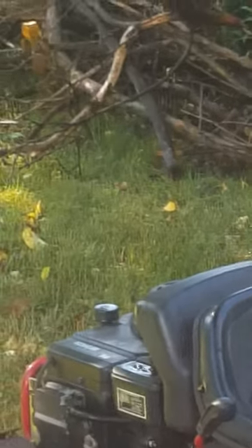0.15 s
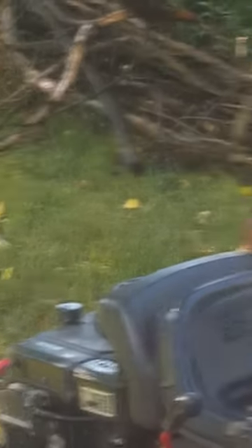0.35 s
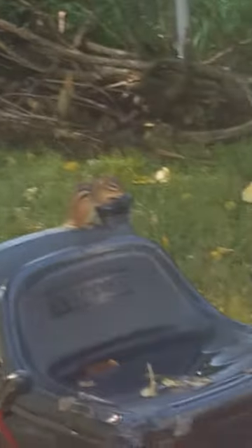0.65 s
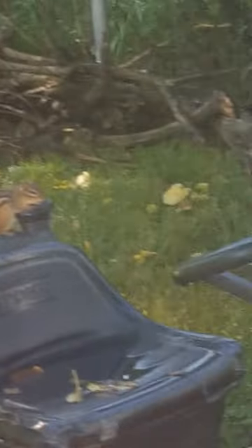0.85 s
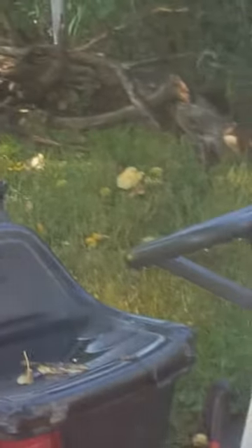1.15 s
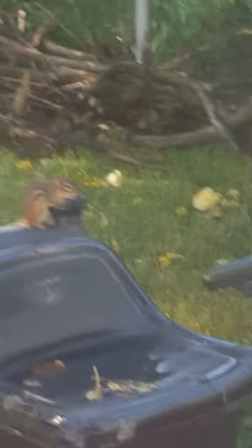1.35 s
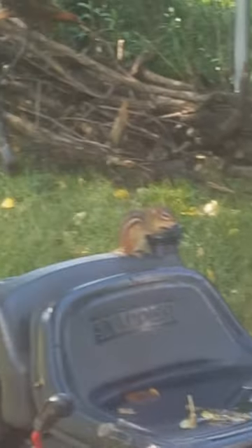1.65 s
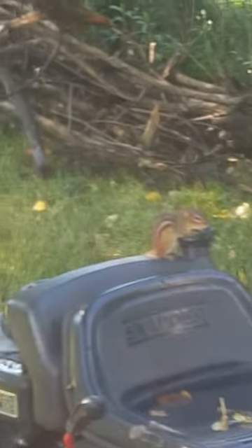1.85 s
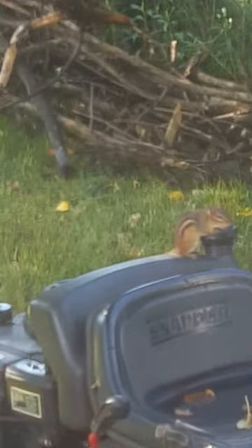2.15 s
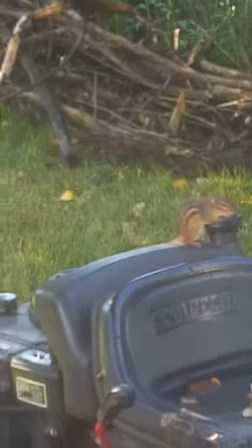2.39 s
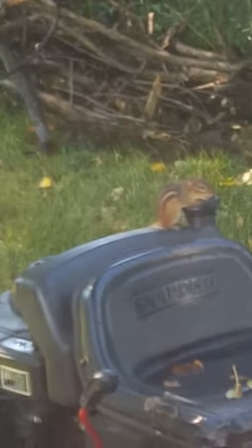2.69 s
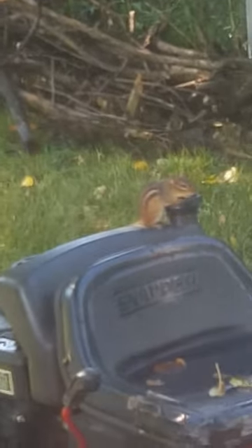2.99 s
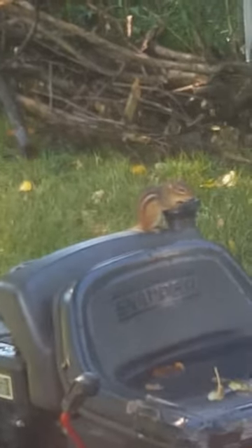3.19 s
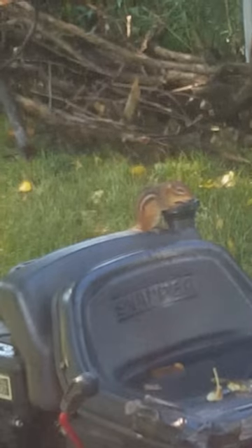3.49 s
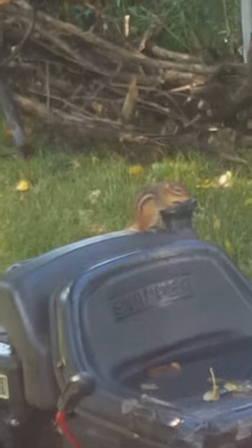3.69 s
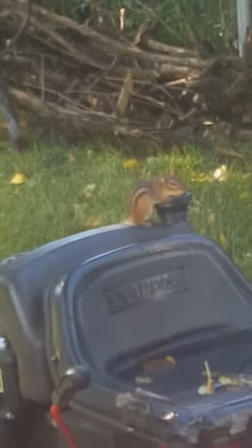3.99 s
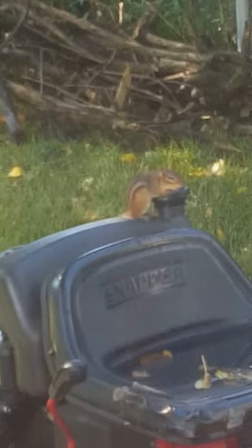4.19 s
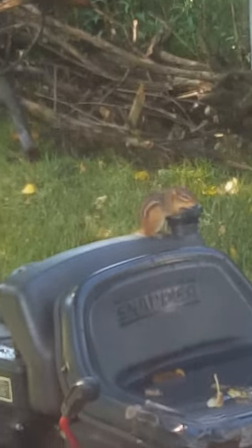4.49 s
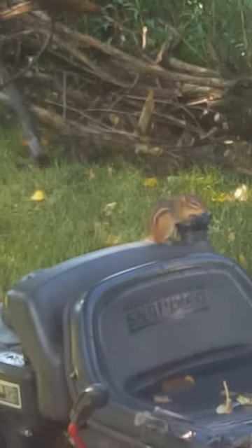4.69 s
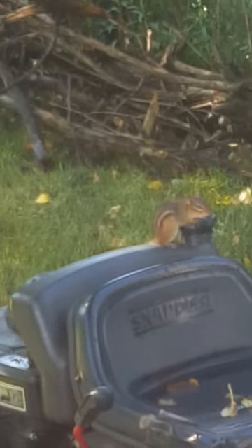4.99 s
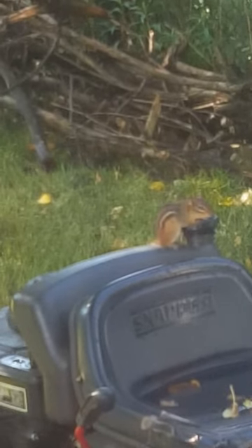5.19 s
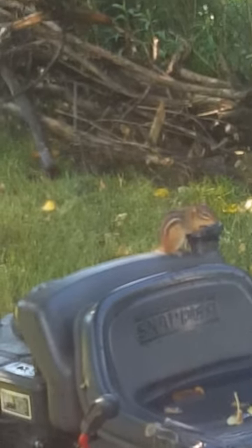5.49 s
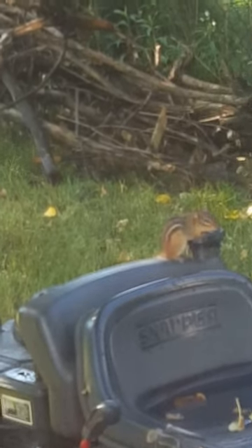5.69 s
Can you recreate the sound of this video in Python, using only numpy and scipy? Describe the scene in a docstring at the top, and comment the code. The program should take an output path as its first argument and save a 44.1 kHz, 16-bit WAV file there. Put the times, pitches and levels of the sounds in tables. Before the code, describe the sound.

A chipmunk chips steadily in a grassy yard while someone close to the microphone makes wavering, raspy lip squeaks; faint birds and a low engine drone behind.

```python
"""Songbirds sing far off over a low outdoor rumble, with a droning engine that eases off midway.
From the start a chipmunk on a parked mower chips its alarm about three times a second: a 50 ms whistle that
plunges in pitch, scattered back by the yard. Two dull bumps on the microphone and a small tick, perhaps a lip
click, follow. Then come seven close, wavering squeaks, probably kissing lips, in groups of three, one and three:
each catches a tone and sings louder as its pitch rises; most change roughness partway, usually into rasp."""
import sys
import numpy as np
from scipy import signal
from scipy.fft import rfft, irfft, next_fast_len
from scipy.io import wavfile
from scipy.ndimage import uniform_filter1d

SR = 44100
rng = np.random.default_rng(int(sys.argv[2]) if len(sys.argv) > 2 else 0)


def int16_out(signal):
    """Quantize to a 16-bit WAV file."""
    q = np.round(np.clip(np.atleast_2d(signal).T, -1, 1) * 32767)
    wavfile.write(sys.argv[1], SR, q.astype(np.int16))


N = 257984
T = np.arange(N) / SR

# colour of the outdoor background: (frequency [Hz], relative level [dB per Hz])
AMBIENCE_COLOUR = [(26, -17.5), (58, 0.5), (105, 2.5), (175, -6), (275, -6), (430, -16), (720, -23),
                   (1550, -32.5), (3600, -27), (6100, -31), (9100, -42), (15900, -40.5)]
RUMBLE_DB = -49
HUM_HZ, HUM_BASE_DB = 66.8, -55

# distant songbird notes: (start [s], level [dB], length [s], top pitch [Hz], place of the top in the note [0-1])
BIRD_NOTES = [(0.251, -49, 0.052, 4380, 0.45), (0.301, -53.5, 0.054, 3700, 0.46),
              (0.638, -45.5, 0.085, 4090, 0), (0.744, -51.5, 0.099, 4690, 0.1), (0.814, -56, 0.04, 3630, 0),
              (1.029, -59, 0.05, 4300, 0.98), (1.108, -51, 0.045, 4580, 0.06),
              (1.158, -52.5, 0.0362, 3670, 1), (1.462, -51.5, 0.033, 3640, 0.39),
              (1.779, -48.5, 0.091, 4000, 0.1), (2.954, -48, 0.045, 4030, .42),
              (3.039, -51.5, 0.076, 3960, 0), (3.777, -50.5, 0.05, 4750, 0.3),
              (3.833, -52, 0.034, 4350, 0.05), (4.407, -50, 0.054, 4150, 0.22),
              (4.687, -51, 0.046, 4530, 0.23), (4.737, -51, 0.046, 3930, 0.24)]
SLUR_SHARE = 0.27  # how far a note slides below its top pitch
# thin, level whistles of a second bird: (start [s], level [dB], length [s])
THIN_NOTES = [(0.052, -64, 0.073), (0.453, -73, 0.037), (1.633, -62, 0.098)]
THIN_HZ = 6700

# two dull bumps and a small tick: (start [s], peak level [dB], centre [Hz], width [Hz], decay [s])
BUMPS_AND_TICK = [(1.3612, -23, 112, 255, 0.035), (1.3719, -26.5, 132, 313, 0.051),
                  (2.119, -37, 2020, 1424, 0.0061)]

# colour of the sizzle at the lip gap: (frequency [Hz], relative level [dB])
GAP_COLOUR = [(1520, -55.5), (2950, -22.5), (3750, -16), (5450, -7.5), (7100, -8), (8600, -5), (10100, 0.5),
              (11650, 7.5), (13100, 4), (14600, 1.5), (15900, -9)]
# colour of the mouth cavity behind the gap: (frequency [Hz], relative level [dB])
CAVITY_COLOUR = [(410, -27.5), (920, -5), (1320, -2), (1920, -6), (2480, 3.5), (2880, -6), (3450, -4),
                 (4450, -14.5), (7900, -17)]
# squeaks: (start [s], attack [s], release [s], time to catch a clean tone [s], time to the break [s],
#           sizzle at the top pitch [dB], sizzle drift over the squeak [dB], mouth tone before the break [dB],
#           mouth tone after it [dB], roughness before the break [0-1], roughness after it [0-1])
SQUEAKS = [(2.2936, .002, 0.025, 0.0024, 0.025, -13.5, 5.5, -33.5, -31.5, 0.13, 0.63),
           (2.4969, 0.00062, 0.036, 0.016, 0.047, -14, -8.5, -40.5, -44, 0.11, 0.7),
           (2.611, 0.055, .018, 0.043, .152, -5.5, -15, -34.5, -32, 0.13, 0.71),
           (3.4123, 0.0041, 0.022, 0.036, 0.033, -13.5, -19, -23.5, -11.5, 1, 0.6),
           (5.051, 0.00081, 0.025, 0.0184, 0.0715, -20.5, 11, -48.5, -34.5, 0.32, 0.31),
           (5.2759, 0.019, 0.023, 0.03, .044, -17, -1, -41.5, -40, 0.18, 0.62),
           (5.405, .001, .005, 0.022, 0.212, -12.5, -10.5, -36, -39, 0.04, 0.23)]
# one pitch curve for each squeak, from its start to its end: (time [s], pitch [Hz])
SQUEAK_PITCH = [
    [(2.2947, 2937), (2.299, 2802), (2.308, 2907), (2.318, 2870), (2.324, 2707), (2.361, 2656),
     (2.388, 1807), (2.412, 1360)],
    [(2.4978, 1317), (2.523, 1767), (2.535, 1940), (2.549, 1670), (2.567, 1210), (2.61, 1006)],
    [(2.612, 1032), (2.645, 1450), (2.663, 1903), (2.682, 1961), (2.714, 1620), (2.767, 2479),
     (2.786, 2390), (2.797, 2722), (2.833, 2533), (2.862, 1580)],
    [(3.4136, 1453), (3.443, 1785), (3.455, 1310), (3.468, 1188), (3.475, 993), (3.487, 891), (3.505, 1017)],
    [(5.0526, 1677), (5.066, 1460), (5.08, 1260), (5.097, 1438), (5.126, 1935), (5.133, 1712),
     (5.152, 1662), (5.197, 1348), (5.217, 1056)],
    [(5.2765, 927), (5.302, 1415), (5.314, 1485), (5.326, 1263), (5.35, 1168), (5.385, 872), (5.418, 736)],
    [(5.405, 728), (5.427, 960), (5.443, 1002), (5.463, 1003), (5.477, 1258), (5.487, 1391), (5.543, 1376),
     (5.677, 1927), (5.691, 1702), (5.755, 1564), (5.793, 1292), (5.849, 1494)],
]
# a tighter gap sounds both higher and louder
SIZZLE_DB_PER_OCTAVE, MOUTH_DB_PER_OCTAVE = 13, 14
FADE_DB = 16     # attack and release span this range
BREAK_S = 0.016  # time the break takes
SPLIT_DEPTH = 0.6  # scales the uneven cycles in a rough squeak

# chipmunk chips: (start [s], level before the throat [dB], starting pitch [Hz])
ALARM = [(0.147, -23, 7960), (0.4973, -23, 7980), (0.855, -24, 7860), (1.169, -23.5, 7700),
         (1.421, -24, 7750), (1.7179, -23.5, 7730), (2.0365, -24, 7820), (2.6995, -24, 8000),
         (3.1324, -22, 8300), (3.4993, -24, 7640), (3.88, -23.5, 8130), (4.192, -24.5, 7760),
         (4.5627, -23, 8260), (4.9849, -24, 7910), (5.335, -24, 7880)]
# the plunge every chip shares, transposed to its starting pitch: (time from its start [s], pitch [Hz])
PLUNGE = [(0, 8000), (.006, 7300), (.012, 6020), (.018, 5450), (.0225, 4830), (.0285, 3450), (.039, 1100),
          (.051, 800)]
# resonances of the chipmunk's throat: (frequency [Hz], gain [dB])
THROAT = [(1000, -34), (1700, -54.5), (3450, -19.5), (5250, 3.3), (6900, -7), (8400, -10.5), (10300, 3.5),
          (12000, -9), (14200, -10), (15900, -19.5)]
CHIP_ATTACK_S, CHIP_RELEASE_S = 0.0007, 0.0066
CHIP_FLUTTER_DB = 1.2  # spread of the quick level flutter within a chip
SCATTER_SPREAD = 0.28  # share by which the yard's scatter evens out the throat's peak

# tone of the muffled right port: (frequency [Hz], gain [dB])
RIGHT_MIC_TONE = [(105, -0.9), (620, -2), (1700, 3.5), (2650, -2), (3650, -12.5), (5250, -11.5),
                  (7600, -24.5), (11100, -18), (15900, -25.5)]
TOP_HZ = 16000  # top of the recorder's band


def undb(db):
    """Decibels to gain."""
    return 10 ** (np.asarray(db) / 20)


def unit(x):
    """Scale to rms 1."""
    return x / np.sqrt(np.mean(x ** 2) + 1e-18)


def ramp(t, length):
    """Rise from 0 at time zero to 1 after a length of time."""
    return np.clip(t / max(length, 1e-4), 0, 1)


def walk(t, rate):
    """A random wander of spread near 1 with rate turns a second."""
    place = (t - t[0]) * rate
    knots = rng.standard_normal(int(place[-1]) + 2)
    return np.interp(place, np.arange(len(knots)), knots)


def play(table):
    """Sample times and the columns of a curve table joined by straight lines."""
    s, *columns = np.transpose(table)
    t = np.arange(s[0], s[-1], 1 / SR)
    return (t, *(np.interp(t, s, c) for c in columns))


def add(out, start, x):
    """Mix x in from a start time in seconds."""
    i = max(int(start * SR), 0)
    out[i:i + len(x)] += x[:max(N - i, 0)]


def colour(x, points):
    """Filter by a (frequency [Hz], gain [dB]) curve, straight over log frequency."""
    hz, db = np.transpose(points)
    size = next_fast_len(x.shape[-1] + 2048)
    f = np.maximum(np.fft.rfftfreq(size, 1 / SR), 1)
    gain = undb(np.interp(np.log(f), np.log(hz), db))
    return irfft(rfft(x, size) * gain, size)[..., :x.shape[-1]]


def resonate(x, hz, width):
    """One resonance, width in Hz."""
    return signal.lfilter(*signal.iirpeak(hz, hz / width, fs=SR), x)


def yard(x, early_db, late_db, early_s=0.023, late_s=0.058, gap_s=0.0062):
    """Scatter from the mower and brush pile, and a tail from the trees, as decaying noise echoes."""
    t = np.arange(SR // 2) / SR
    noise = rng.standard_normal((2, len(t)))
    early = unit(noise[0] * np.exp(-t / early_s) * (t > gap_s))
    late = unit(noise[1] * np.exp(-t / late_s) * (t > 2 * gap_s))
    echoes = undb(early_db) * early + undb(late_db) * late
    return signal.fftconvolve(x, echoes / np.sqrt(len(t)))[:N]


def rumble(side_db=-7.0, swell_db=1.5):
    """Far traffic rumble and thin hiss: coloured noise, swelling gently, mostly common to both ports."""
    mid, side = (unit(colour(rng.standard_normal(N), AMBIENCE_COLOUR)) * undb(swell_db * walk(T, 5.7))
                 for _ in range(2))
    return undb(RUMBLE_DB) * (mid + undb(side_db) * side * np.array([[1], [-1]]))


def engine_drone():
    """A distant engine: one low sine that wavers in pitch and level."""
    hz = HUM_HZ * (1 + 0.019 * walk(T, 2.97))
    drone = np.sqrt(2) * np.sin(2 * np.pi * np.cumsum(hz) / SR)
    easing_db = np.interp(T, [2.25, 3.25], [3.2, 0])  # stronger in the first part
    return drone * undb(HUM_BASE_DB + 0.57 * walk(T, 3.86) + easing_db)


def bird_note(hz, quaver):
    """One sung note: a sine on a quavering pitch contour, with soft ends."""
    t = np.arange(len(hz)) / SR
    phase = 2 * np.pi * np.cumsum(hz * (1 + quaver * walk(t, 300.6))) / SR
    return unit(np.sin(phase) * signal.windows.hann(len(t)) ** 0.33)


def songbirds(warble=0.0473, thin_warble=0.024, direct_db=0.5):
    """Slurred, quavering notes and a few thin whistles from the trees, half lost in reverberation."""
    x = np.zeros(N)
    for start, db, length, top_hz, place in BIRD_NOTES:
        away = abs(np.linspace(0, 1, int(length * SR)) - place)
        hz = top_hz * (1 - SLUR_SHARE * away / away.max())
        add(x, start, undb(db) * bird_note(hz, warble))
    for start, db, length in THIN_NOTES:
        hz = np.full(int(length * SR), THIN_HZ)
        add(x, start, undb(db) * bird_note(hz, thin_warble))
    return np.array([undb(direct_db) * x + yard(x, early_db=1.5, late_db=-2.0, late_s=0.092)
                     for _ in range(2)])


def bumps_and_tick():
    """Two dull bumps and later a small tick: a push and decaying noise ring at each one's pitch."""
    x = np.zeros(N)
    t = np.arange(SR // 10) / SR
    for start, db, hz, width, decay in BUMPS_AND_TICK:
        push = np.exp(-t / 0.0015) + 0.24 * rng.standard_normal(len(t)) * np.exp(-t / decay)
        ring = resonate(resonate(push, hz, width), hz, 2 * width)
        add(x, start, undb(db) * ring / abs(ring).max())
    return x


def gesture(row, pitch):
    """Pitch, levels and roughness of a squeak: rough onset, caught tone, swell with pitch, then the break."""
    attack, release, catch, breaks, sizzle_db, drift_db, mouth_db, broken_mouth_db, rough, broken_rough = row[1:]
    t, hz = play(pitch)
    t = t - t[0]
    octaves = np.log2(hz / hz.max())
    fade_db = FADE_DB * (ramp(t, attack) * ramp(t[-1] - t, release) - 1)
    broken = ramp(t - breaks + BREAK_S / 2, BREAK_S)
    sizzle = sizzle_db + drift_db * t / t[-1] + SIZZLE_DB_PER_OCTAVE * octaves + fade_db
    mouth = mouth_db + (broken_mouth_db - mouth_db) * broken + MOUTH_DB_PER_OCTAVE * octaves + fade_db
    uncaught = 1 - ramp(t, catch) ** 2
    roughness = np.maximum(rough + (broken_rough - rough) * broken, uncaught)
    return t, sizzle, mouth, roughness, hz


def lip_flutter(t, hz, phase, rough, partial_db=4.0):
    """The wet gap's tone: 20 harmonics, with cycles that alternate in strength when the gap loosens."""
    flutter = 0
    # the gap keeps changing shape, so each partial swells and shifts on its own
    for k in np.arange(20) + 1:
        swell = undb(partial_db * walk(t, 67.9))
        partial = np.cos(k * phase + 1.48 * walk(t, 25.54))
        flutter = flutter + swell * partial * (k * hz < SR * 0.42)
    flutter = flutter * np.sqrt(hz / 11000)
    # slipping between patterns of two and three cycles puts lines between the harmonics
    pairs = np.clip(0.5 + walk(t, 35), 0, 1)
    pattern = pairs * np.cos(phase / 2) + (1 - pairs) * np.cos(phase / 3)
    return flutter * (1 + SPLIT_DEPTH * np.clip(4 * rough - 0.6, 0, 1.5) * pattern)


def squeak(row, pitch, jitter=0.0448, waver=0.0071, hiss=1.0, mouth_hiss=0.42):
    """A tight wet gap flutters; when it loosens, the cycles go uneven and hiss."""
    t, sizzle_db, mouth_db, rough, hz = gesture(row, pitch)
    rough = np.clip(rough, 0, 1)
    stumble = 0.035 * rough * walk(t, 240)
    wander = waver * walk(t, 90) + stumble + jitter * rough ** 2 * walk(t, 1300)
    hz = uniform_filter1d(hz, size=300, mode="nearest") * (1 + wander)
    phase = 2 * np.pi * np.cumsum(hz) / SR
    flutter = lip_flutter(t, hz, phase, rough)
    air = rough * rng.standard_normal(len(t)) * (1 + 0.45 * np.cos(phase))  # hiss pulses with the gap
    out = 0
    for points, db, share in ((GAP_COLOUR, sizzle_db, hiss), (CAVITY_COLOUR, mouth_db, mouth_hiss)):
        x = colour(flutter + share * air, points)
        # even out the running level, then let the gesture set it
        level = np.sqrt(uniform_filter1d(x ** 2, size=300) + 1e-9)
        out = out + x / level * undb(db)
    sputter = undb(2 * rough * walk(t, 650))
    soft_ends = np.clip(np.minimum(t - t[0], t[-1] - t) / 0.0021, 0, 1)
    return out * sputter * soft_ends


def squeaks(lag_s=0.00006, hand_s=0.00035, right_direct_db=0.5, hand_db=-2.0, turn_hz=1380, turn_width_hz=230):
    """Close, nearly dry squeaks; the right port adds a bounce off the hand and a resonant phase turn."""
    left = np.zeros(N)
    for row, pitch in zip(SQUEAKS, SQUEAK_PITCH):
        add(left, row[0], squeak(row, pitch))
    direct = undb(right_direct_db) * np.roll(left, int(lag_s * SR))
    off_hand = undb(hand_db) * np.roll(left, int((lag_s + hand_s) * SR))
    right = direct + off_hand
    right = right - 2 * resonate(right, turn_hz, turn_width_hz)  # all-pass: turns only the phase
    return np.array([port + yard(port, early_db=-8, late_db=-23, early_s=0.012) for port in (left, right)])


def chipmunk(octave_db=-5.0, third_db=-16.0, right_overtones_db=-4.0,
             bounce_db=-1.5, bounce_s=0.0021, right_lag_s=0.00027):
    """A whistle with two overtones plunges through the throat's resonances; a seat bounce ripples it."""
    out = np.zeros((2, N))
    t, plunge_hz = play(PLUNGE)
    envelope = ramp(t, CHIP_ATTACK_S) * ramp(t[-1] - t, CHIP_RELEASE_S)
    throat_hz, throat_db = np.transpose(THROAT)
    for start, chip_db, start_hz in ALARM:
        hz = plunge_hz * start_hz / plunge_hz[0]
        phase = 2 * np.pi * np.cumsum(hz * (1 + 0.014 * walk(t, 370))) / SR
        size = np.sqrt(2) * envelope * undb(chip_db + CHIP_FLUTTER_DB * walk(t, 560))
        # throat gain at the whistle, its octave and its third harmonic
        db = [np.interp(np.log(k * hz), np.log(throat_hz), throat_db) for k in np.arange(3) + 1]
        whistle = undb(db[0]) * np.sin(phase)
        octave = undb(octave_db + db[1]) * np.sin(2 * phase)
        third = undb(third_db + db[2]) * np.sin(3 * phase) * (hz < SR / 7)
        # the overtones die away as the voice slackens at the bottom of the sweep
        bright = ramp(hz - 2300, 1300)
        overtones = bright * (octave + third)
        # only the treble is scattered back; averaged over all directions,
        # it follows the sweep's peak less closely
        scatter = bright * undb(-SCATTER_SPREAD * np.maximum(db[0], -20))
        for port, shade_db, arrival in zip(out, (0, right_overtones_db), (start, start + right_lag_s)):
            x = size * (whistle + undb(shade_db) * overtones)
            add(port, arrival, x)
            add(port, arrival + bounce_s, undb(bounce_db) * x)
            add(port, arrival, yard(x * scatter, early_db=-1.5, late_db=-9.5))
    return out


def scene():
    """Everything that reaches the two ports, background first."""
    return rumble() + engine_drone() + songbirds() + bumps_and_tick() + squeaks() + chipmunk()


def record(dry):
    """The right port loses its treble; the recorder clips the tallest peaks and cuts the top."""
    ports = np.array([dry[0], colour(dry[1], RIGHT_MIC_TONE)])
    ports = np.clip(ports, -0.75, 0.75)
    return signal.sosfilt(signal.ellip(10, 0.2, 80, TOP_HZ, fs=SR, output="sos"), ports)


dry = scene()
out = record(dry)
int16_out(out)
```